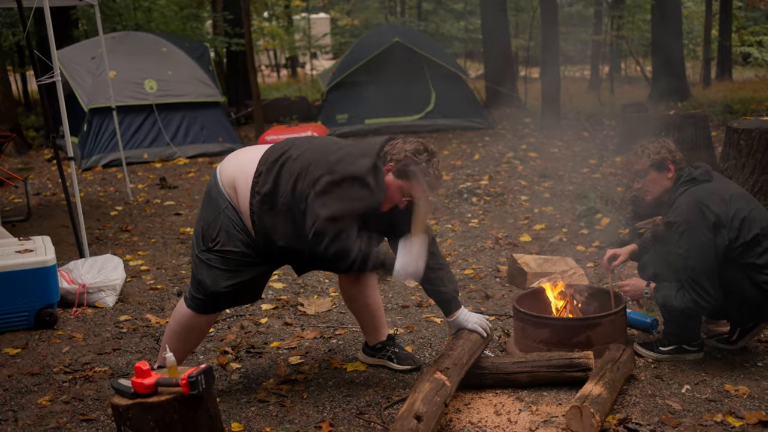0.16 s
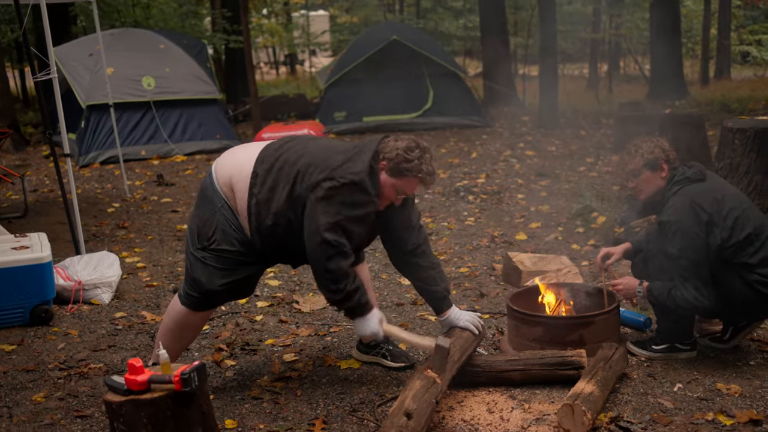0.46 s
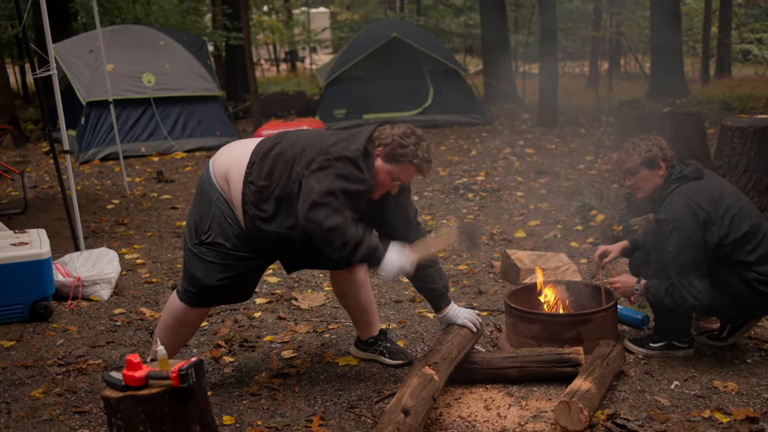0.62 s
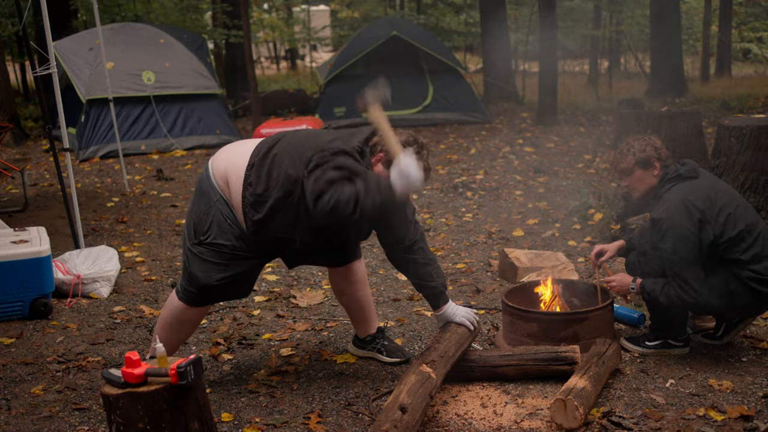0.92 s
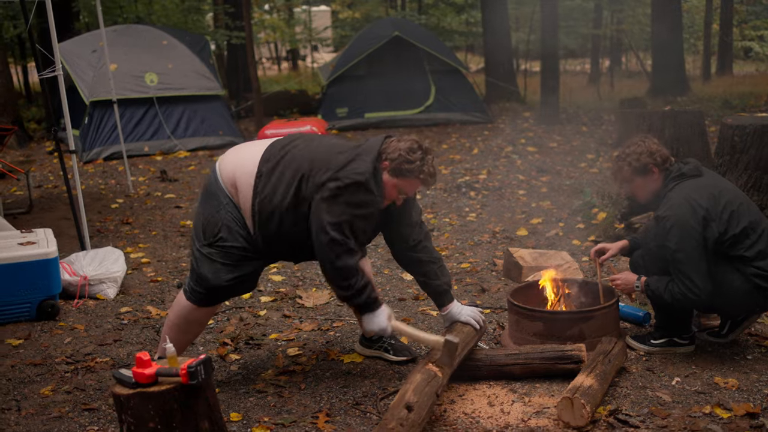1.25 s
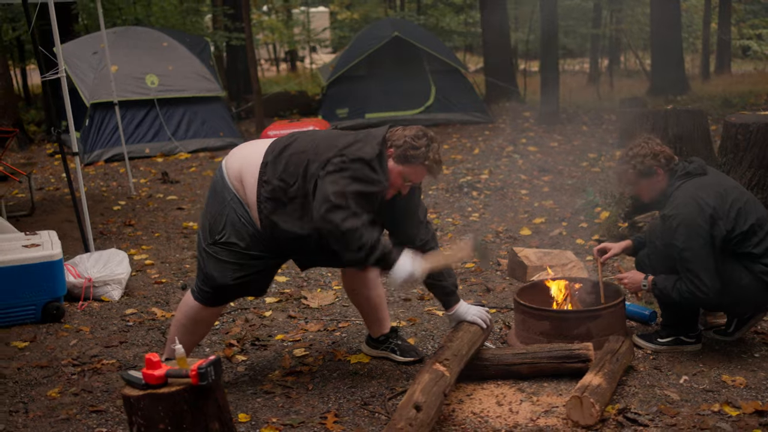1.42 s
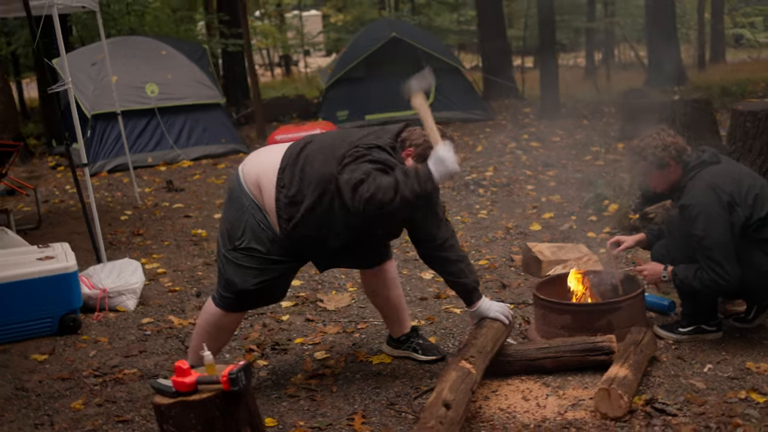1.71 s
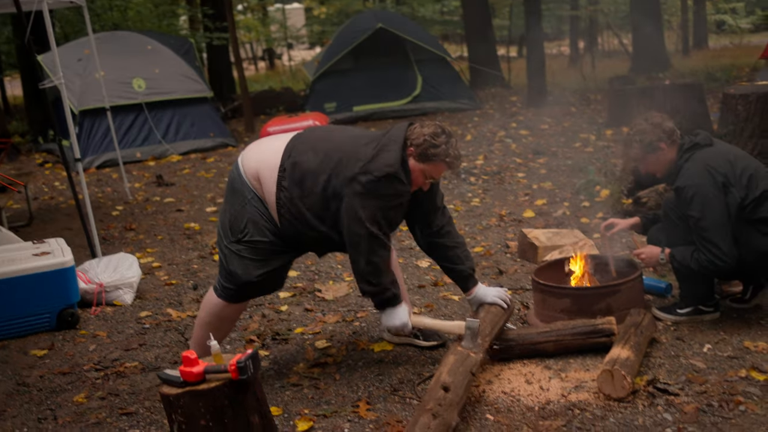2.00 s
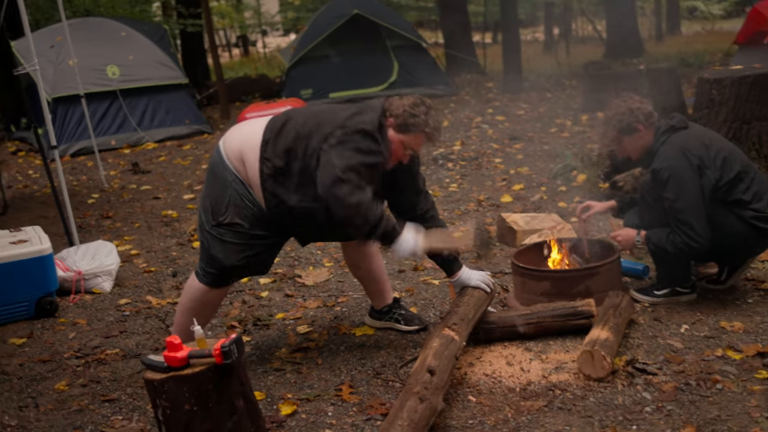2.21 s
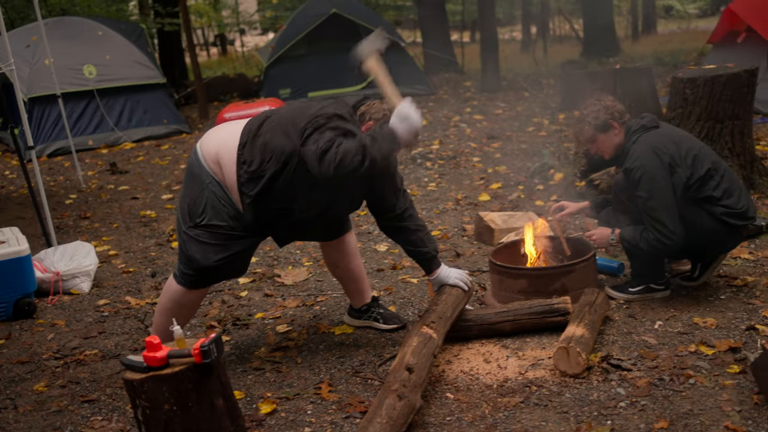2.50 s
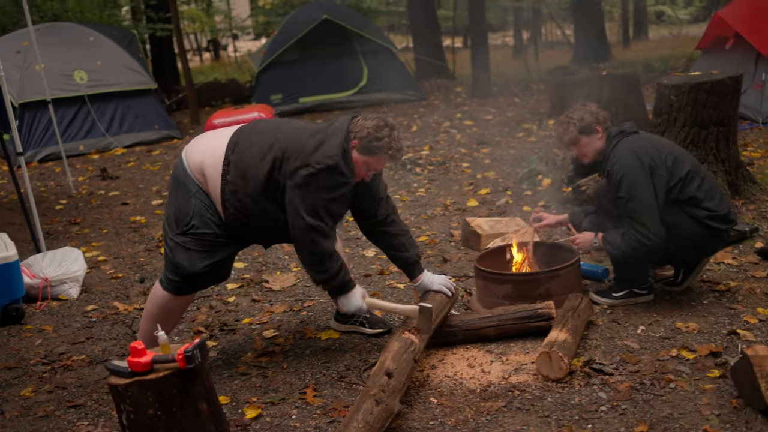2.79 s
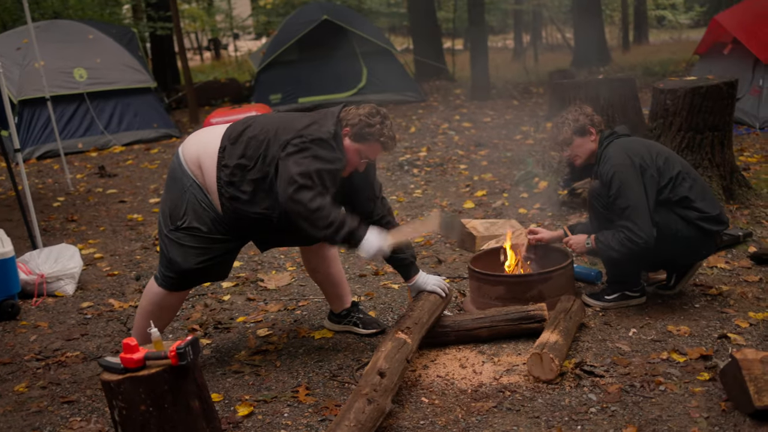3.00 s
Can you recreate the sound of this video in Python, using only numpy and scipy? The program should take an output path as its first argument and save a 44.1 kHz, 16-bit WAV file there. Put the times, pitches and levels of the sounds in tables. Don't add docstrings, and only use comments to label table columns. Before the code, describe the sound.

After a quick sleeve swish, four sharp hatchet chops land in a log under a second apart, the third hardest and most metallic, with splinter clicks, quiet fire and insect hiss in open woods, closely miked.

```python
import sys
import numpy as np
from scipy import signal
from scipy.fft import rfft, irfft
from scipy.io import wavfile

SR = 44100
rng = np.random.default_rng(int(sys.argv[2]) if len(sys.argv) > 2 else 0)


def makeup_ratio(level_db):
    decades = np.asarray(level_db, float) / 20
    return 10 ** decades


def transcribe(u):
    v = np.clip(np.atleast_2d(u).T, -1, 1)
    q = np.round(v * 32767).astype(np.int16)
    wavfile.write(sys.argv[1], SR, q)


N = 138915
LEAD_S = 1 / 100

# [t/s, low wood mode level/dB, upper wood mode f/Hz, upper wood mode level/dB, crack level/dB]
BLOWS = [
    (0.2936, -1.5, 1135, -7.5, -4.5),
    (1.1231, -4, 988, -4.5, -7),
    (1.9486, -0.5, 1104, -13, -1),
    (2.7403, -3, 1137, -4.5, -2.5),
]


def rms_one(x):
    return x / np.sqrt(np.mean(x ** 2) + 1e-20)


def at_hz(points, hz, axis=1):
    table = np.array(points)
    return np.interp(np.log(np.maximum(hz, 1)), np.log(table[:, 0]), table[:, axis])


def in_time(rows):
    s, db = np.transpose(rows)
    return makeup_ratio(np.interp(np.arange(N) / SR, s, db))


def coloured(spectrum, size=N):
    hz = np.arange(size // 2 + 1) * SR / size
    white = rfft(rng.standard_normal(size))
    return rms_one(irfft(white * makeup_ratio(at_hz(spectrum, hz)), size))


def drift(rate):
    r = np.exp(-80 * np.pi * rate / SR)
    noise = rng.standard_normal(N // 40 + 2002)
    slow = signal.lfilter([1], [1, -2 * r, r * r], noise)[2000:]
    return np.interp(np.arange(N) / 40, np.arange(len(slow)), rms_one(slow))


def band_pass(x, low_hz, high_hz, order=3):
    sos = signal.butter(order, [low_hz, high_hz], "band", fs=SR, output="sos")
    return signal.sosfilt(sos, x + 1e-18)


def ring(x, hz, t60):
    r = makeup_ratio(-60 / (t60 * SR))
    w = 2 * np.pi * hz / SR
    return signal.lfilter([0, np.sin(w)], [1, -2 * r * np.cos(w), r * r], x + 1e-18)


def modes(table, force, times=1, extra_db=0, signs=None):
    detune, uneven_db = 0.015, 2.5
    luck = rng.uniform(-1, 1, (len(table), 2))
    hz, db, t60 = np.transpose(table)
    signs = signs or np.where(np.arange(len(table)) < 3, 1, -1)
    hz = hz * times * (1 + detune * luck[:, 0])
    gain = makeup_ratio(db + extra_db + uneven_db * luck[:, 1]) * signs
    return sum(g * ring(force(f), f, d) for f, g, d in zip(hz, gain, t60))


def add(out, s, sound):
    i = int(s * SR)
    out[i:i + len(sound)] += sound[:len(out) - i]


def air():
    # [f/Hz, level/dB]
    air_colour = [(150, -6), (260, -11), (520, -7), (800, -14.5), (1200, -12.5), (2000, -18), (5200, -24),
                  (16000, -34)]
    return makeup_ratio(-60 + 0.7 * drift(5.9)) * coloured(air_colour)


def insects():
    hiss = rms_one(band_pass(rng.standard_normal(N), 4000, 4700))
    return hiss * makeup_ratio(-68.5 + 1.5 * drift(13.0))


def breeze():
    # [t/s, level/dB]
    gusts = [(0, -70), (.14, -52), (.25, -46.5), (.42, -51), (.47, -82), (.65, -70), (.8, -55), (1.1, -54),
             (1.4, -52.5), (1.52, -63), (1.63, -51.5), (1.8, -55), (1.9, -44.5), (2.05, -50), (2.3, -57),
             (2.55, -61.5), (2.97, -49.5), (3.15, -61)]
    # [f/Hz, level/dB]
    rumble = [(12, -17.5), (25, 0.5), (50, -3), (81, 1.5), (125, -12.5), (200, -20.5), (300, -46.5),
              (660, -91)]
    return in_time(gusts) * makeup_ratio(2 * drift(6.8)) * coloured(rumble)


def fire():
    crackles_per_s, crackle_db = 25, -52
    patter_per_s, patter_s = 120, 0.3
    t = np.arange(N) / SR
    rate = crackles_per_s
    for s, *_ in BLOWS:
        rate = rate + patter_per_s * (t > s) * np.exp(-np.abs(t - s) / patter_s)
    size = makeup_ratio(4.0 * np.minimum(rng.exponential(1, N), 2.5))
    clicks = (rng.random(N) < rate / SR) * size
    dealt = rng.integers(0, 8, N)
    out = np.zeros(N)
    for k, hz in enumerate(np.geomspace(2000, 14000, num=8)):
        out += ring(clicks * (dealt == k), hz, 6.0 / hz)
    return makeup_ratio(crackle_db) * out


def ticks():
    # [t/s, peak level/dB, f/Hz, ring/cycles]
    tick_events = [(.040, -45.5, 5040, 1.7), (0.108, -44.5, 4270, 8.1), (.528, -41.5, 10800, 4.8),
                   (.937, -40.5, 4230, 7.4), (1.458, -36.5, 3000, 3.9), (1.46, -47.5, 995, 62),
                   (1.516, -43, 1500, 4.3), (1.679, -56, 7800, 5), (2.164, -40, 11550, 5),
                   (2.199, -32, 1150, 9.7), (2.323, -45, 1250, 15.6), (2.475, -49, 528, 5.7),
                   (2.55, -47, 2940, 10.2), (2.619, -44, 2820, 10), (2.645, -45.5, 7320, 4.9),
                   (2.694, -43, 1550, 3.3), (2.217, -43, 5200, 6), (2.224, -46, 6000, 7.3),
                   (2.565, -49, 13800, 8), (2.96, -46.5, 1644, 40), (2.941, -42, 9000, 3.3),
                   (3.047, -40.5, 4120, 3.9), (3.063, -46.5, 10500, 3.7)]
    out = np.zeros(N)
    puff_decay = makeup_ratio(-60 * np.arange(SR // 20) / SR / 0.011)
    for s, db, hz, cycles in tick_events:
        puff = rng.standard_normal(SR // 20) * puff_decay
        tick = ring(ring(puff, hz, cycles / hz), hz, 2.6 / hz)
        add(out, s, makeup_ratio(db) * tick / np.abs(tick).max())
    return out


def swish():
    # [t/s, level/dB]
    swing = [
        (0.08, -86),
        (0.108, -60),
        (0.116, -70),
        (0.23, -39.5),
        (0.285, -31.5),
    ]
    # [f/Hz, level/dB]
    cloth = [(200, -1), (1300, -9.5), (2600, -11.5), (7000, -23), (9200, -16.5), (11500, -24),
             (13600, -7.5), (16000, -6)]
    t = np.arange(N) / SR
    fade_in = np.clip((t - 0.05) / 0.107, 0, 1)
    fade_out = np.clip((0.33 - t) / 0.1, 0, 1)
    return in_time(swing) * coloured(cloth) * fade_in * fade_out


def wood(t, rise, low_db, up_hz, up_db, low_pitch, landing_db):
    # [f/Hz, level/dB, t60/s]
    log_low = [(324, -11, .04), (423, -7, .075), (489, 2, 0.032), (590, -6.5, 0.089), (784, -6.5, 0.029)]
    # [f as a multiple of the blow's upper mode, level/dB, t60/s]
    log_up = [(.9, 1, 0.03), (1.0, 10.5, 0.021), (1.1, -2.5, 0.032), (1.45, -0.5, 0.022),
              (1.7, -11.5, 0.018), (2.4, -19.5, .02)]
    low_signs = [1, 1, 1, -1, -1]

    def bite(hz):
        return rise * np.cos(2 * np.pi * hz * t) / rise.sum() * 2

    low = makeup_ratio(low_db) * modes(log_low, bite, low_pitch, landing_db, low_signs) / 2
    return low - makeup_ratio(up_db) * modes(log_up, bite, up_hz) / 2


def steel(stop, steel_db, high_db):
    # [f/Hz, level/dB, t60/s]
    head = [(3810, -3.5, 0.01), (4270, -2.5, 0.0085), (4800, -6, 0.0065), (6470, -10, .006)]
    # [f/Hz, level/dB, t60/s]
    head_high = [(8900, 0, .01), (9500, -3, .01), (13700, 0, .008)]
    low = makeup_ratio(steel_db) * modes(head, lambda hz: stop) / 2
    return low + makeup_ratio(high_db) * modes(head_high, lambda hz: stop)


def ground(t, ground_db):
    # [f/Hz, level/dB, t60/s]
    soil = [(66, -5.5, .16), (85, 3, 0.43), (119, -2, 0.19), (207, 10, .07), (250, -0.5, 0.021)]
    lag_s = 0.006
    after = np.maximum(t, 0)
    slow = after * np.exp(-after / lag_s)
    return makeup_ratio(ground_db) * modes(soil, lambda hz: slow / slow.sum()) * 2


def crack(t, rise, stop, crack_db):
    # [f/Hz, level/dB]
    fracture = [(880, -129), (1500, -1), (2300, -7.5), (5020, -6), (6760, -13.5), (16000, -22)]
    bite_db, burst_t60_s = -17, 0.0036
    splinter_db, splinter_t60_s = -18.5, 0.05
    snap_db = 8
    after = makeup_ratio(-60 * t / burst_t60_s) + makeup_ratio(splinter_db - 60 * t / splinter_t60_s)
    shape = np.where(t < 0, makeup_ratio(bite_db) * rise, after)
    snap = makeup_ratio(snap_db) * band_pass(stop, 2600, 5600, order=1)
    return makeup_ratio(crack_db) * (shape * coloured(fracture, size=len(t)) + snap)


def blow(low_db, up_hz, up_db, crack_db, ground_db, steel_db, high_db, low_pitch, landing_db):
    bite_s = 0.0011
    t = np.arange(SR // 2) / SR - LEAD_S
    rise = np.exp(np.minimum(t, 0) / bite_s) * (t <= 0)
    stop = 1.0 * (np.arange(len(t)) == SR // 100)
    struck = wood(t, rise, low_db, up_hz, up_db, low_pitch, landing_db) + steel(stop, steel_db, high_db)
    return struck + ground(t, ground_db) + crack(t, rise, stop, crack_db)


def trees():
    # [f/Hz, level/dB, t60/s]
    trunks = [(62, -13.5, 0.65), (198, 1.5, 0.33), (530, -1, 0.63), (1200, -9, 0.81), (3000, 5, 1),
              (5100, 9, 0.99), (9000, 1.5, 0.86), (15300, -9, 0.76)]
    near_t60_s, near_db, scatter_rise_s = 0.12, 7, 0.012
    t = np.arange(SR) / SR
    white = rng.standard_normal((2, SR))
    limits = 40 * 2 ** np.arange(0, 9, .5)
    near = makeup_ratio(near_db - 60 * t / near_t60_s)
    out = np.zeros(SR)
    for k, (low, high) in enumerate(zip(limits, limits[1:])):
        hz = np.sqrt(low * high)
        band = band_pass(white[k % 2], low, high, order=2)
        far = makeup_ratio(-60 * t / at_hz(trunks, hz, axis=2))
        out += makeup_ratio(at_hz(trunks, hz)) * band * (far + near)
    return out * (1 - np.exp(-(t / scatter_rise_s) ** 2))


def chopping():
    # [ground level/dB, steel level/dB, high steel level/dB, low wood pitch as a multiple]
    extras = [(-19.5, 1.5, -28.5, 1.01), (-19.5, -6.5, -36, .98), (-29, 7.5, -5.5, .99),
              (-23.5, -2.5, -37, .98)]
    # [level/dB, one per mode]
    landings = [(0.5, 1, 1.1, 0.1, -3.5), (5, 2.6, -2, 1.1, 3), (-22, -4, 0.6, 0.1, -5),
                (0, -0.5, 3, 2.6, 1.5)]
    # [wood level/dB, crack level/dB, steel level/dB, steel band from f/Hz, to f/Hz]
    scatter = [(-47, -47, -45.5, 4000, 5400), (-50, -56.5, -47, 4000, 4200),
               (-49, -46.5, -34.5, 3844, 4600), (-50, -54.5, -54, 3900, 4800)]
    far_wood_hz, far_wood_t60_s = 558, 0.0071
    far_high_db = -44
    out = np.zeros(N)
    click = 1.0 * (np.arange(SR // 20) == 0)
    for (s, *body), metal, landing_db, far in zip(BLOWS, extras, landings, scatter):
        add(out, s - LEAD_S, blow(*body, *metal, np.array(landing_db)))
        wood_db, crack_db, steel_db, *steel_hz = far
        up_hz, high_db = body[1], metal[2]
        knock = ring(click, far_wood_hz, far_wood_t60_s) + 2.01 * ring(click, up_hz, far_wood_t60_s)
        clang = band_pass(click, *steel_hz, order=2) * 2
        high = makeup_ratio(high_db + far_high_db) * band_pass(click, 8300, 9500, order=1)
        sent = makeup_ratio(crack_db) * click - makeup_ratio(wood_db) * knock + makeup_ratio(steel_db) * clang + high
        add(out, s, signal.fftconvolve(sent, trees()))
    return out


def rebounds():
    # [t/s, level/dB, f/Hz, t60/s]
    taps = [(.2955, -13, 1200, 0.011), (1.1252, -14, 940, 0.017), (1.1244, -10.5, 1270, .02),
            (1.1245, -14.5, 1850, 0.02), (0.295, -13, 1880, 0.014), (1.1235, -18.5, 3350, 0.0052),
            (2.22, -36, 1230, 0.023), (2.232, -37.5, 1140, .02), (2.247, -40.5, 1300, .02),
            (.2985, -12, 5400, .008), (.301, -26.5, 1550, .012), (.333, -28, 1200, .012),
            (.336, -26, 590, .04), (.347, -28, 4500, .006), (1.127, -18, 4500, .008),
            (1.128, -18.5, 2800, .01), (1.132, -20, 1500, .012), (1.137, -18, 2300, .01),
            (1.137, -19.5, 750, .025), (1.155, -29, 850, .02), (1.161, -23, 1200, 0.0093),
            (1.165, -23, 570, .04), (1.178, -38, 900, .02), (1.952, -14, 4800, .012),
            (1.953, -18, 1400, .015), (1.988, -31, 1300, .01), (1.997, -35, 740, .02),
            (2.744, -16, 3100, .012), (2.748, -15, 1400, .015), (2.764, -20, 750, .02),
            (2.779, -27, 1000, .012), (2.782, -27, 580, .045), (2.801, -30, 1200, .015),
            (.880, -44.5, 1180, .03), (2.618, -41, 3600, .005)]
    out = np.zeros(N)
    click = 1.0 * (np.arange(SR // 10) == 0)
    for s, db, hz, t60 in taps:
        tap = ring(click, hz, 3.0 / hz)
        knock = ring(tap, hz, t60) + 0.7 * ring(tap, 1.09 * hz, t60 / 2)
        add(out, s, makeup_ratio(db) * knock / np.abs(knock).max())
    return out


def showers():
    # [t/s, length/s, level/dB, f/Hz]
    falls = [(0.371, 0.012, -46.5, 9000), (0.418, 0.016, -35.5, 48.6), (0.491, 0.024, -52.5, 12640),
             (0.725, 0.028, -52.5, 1440), (0.896, 0.028, -51.5, 250), (1.171, 0.064, -47.5, 9000),
             (1.201, 0.022, -43.5, 5600), (1.236, 0.032, -52.5, 11100), (2.028, 0.074, -45.5, 9020),
             (2.114, 0.037, -50.5, 11200), (2.03, .09, -53, 14000), (2.204, 0.0079, -51, 1290),
             (2.237, 0.054, -49, 1200), (2.565, 0.0053, -44, 1120), (2.579, 0.027, -45, 1620),
             (2.822, 0.035, -45.5, 7564), (2.866, 0.025, -55, 9000)]
    chips_per_s, spread_db, ring_cycles = 2500, 3.5, 4.0
    out = np.zeros(N)
    t = np.arange(SR // 8) / SR - 1 / 16
    for s, length, db, hz in falls:
        hits = rng.random(len(t)) < chips_per_s / SR
        size = makeup_ratio(spread_db * np.minimum(rng.exponential(1, len(t)), 2))
        size = size * rng.choice([-1, 1], len(t))
        grains = rms_one(ring(hits * size, hz, ring_cycles / hz))
        add(out, s - 1 / 16, makeup_ratio(db) * grains * np.exp(-(2 * t / length) ** 2))
    return out


def far_chirp():
    # [t/s, length/s, level/dB]
    bursts = [
        (2.13, .03, -58),
        (2.162, .02, -59),
        (2.192, .015, -64),
    ]
    out = np.zeros(N)
    t = np.arange(SR // 8) / SR - 1 / 16
    for s, length, db in bursts:
        add(out, s - 1 / 16, makeup_ratio(db) * np.sin(2 * np.pi * 7800 * t) * np.exp(-(2 * t / length) ** 2))
    return out


def scene():
    around = air() + insects() + breeze() + fire() + ticks() + swish()
    return (around + chopping() + rebounds() + showers() + far_chirp())[None]


def top_cut(x):
    return signal.sosfilt(signal.butter(12, 16450, fs=SR, output="sos"), x)


def record(dry):
    top, knee = makeup_ratio(0.3), 6.0
    clipped = dry / (1 + np.abs(dry / top) ** knee) ** (1 / knee)
    low_pass = signal.cheby2(12, 62, 16600, fs=SR, output="sos")
    mix = signal.sosfilt(low_pass, clipped)
    return top_cut(mix)


dry = scene()
out = record(dry)
transcribe(out)
```